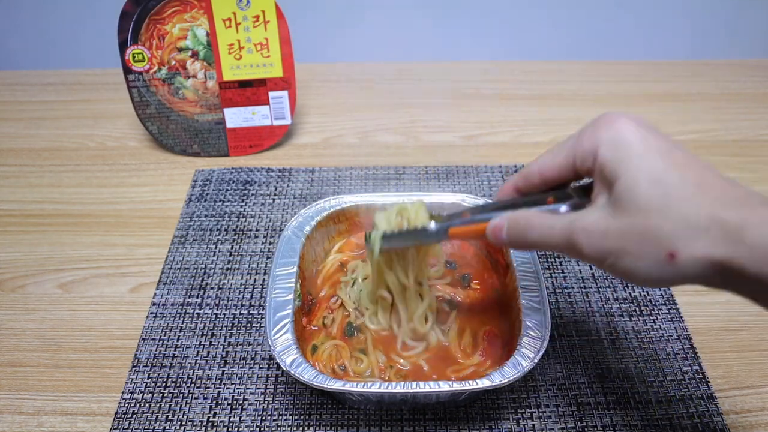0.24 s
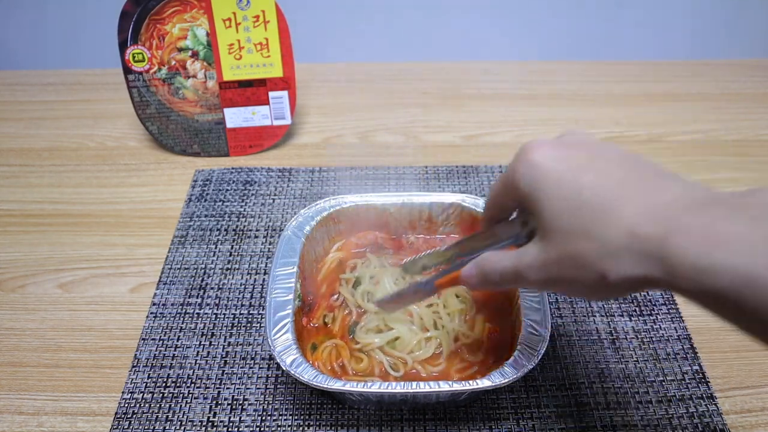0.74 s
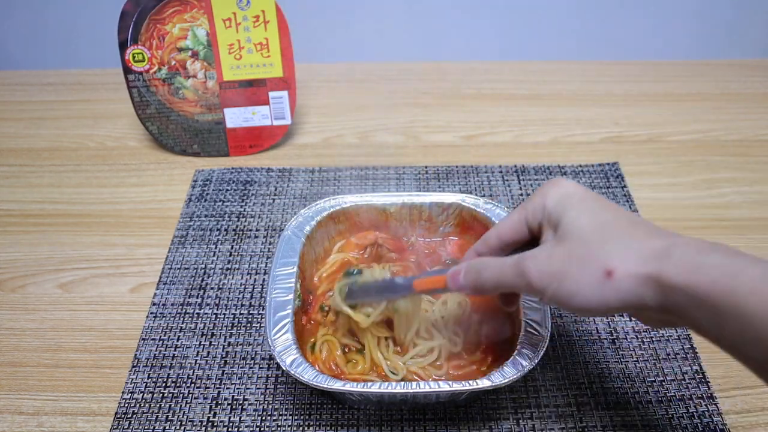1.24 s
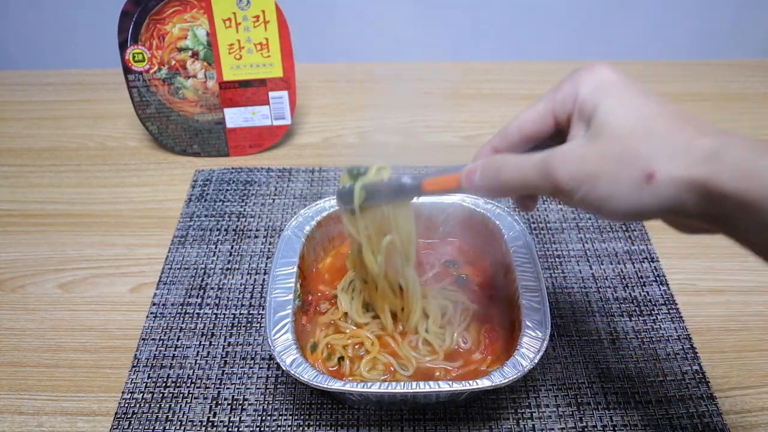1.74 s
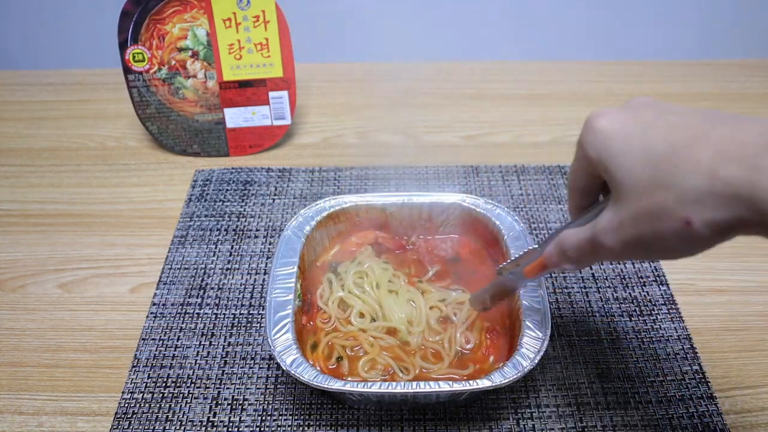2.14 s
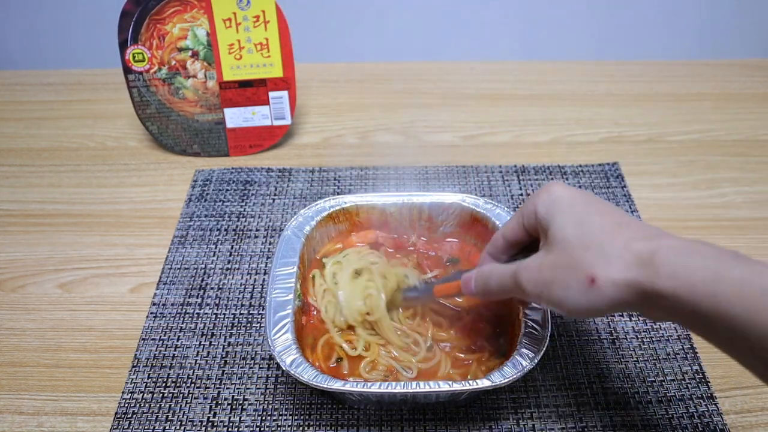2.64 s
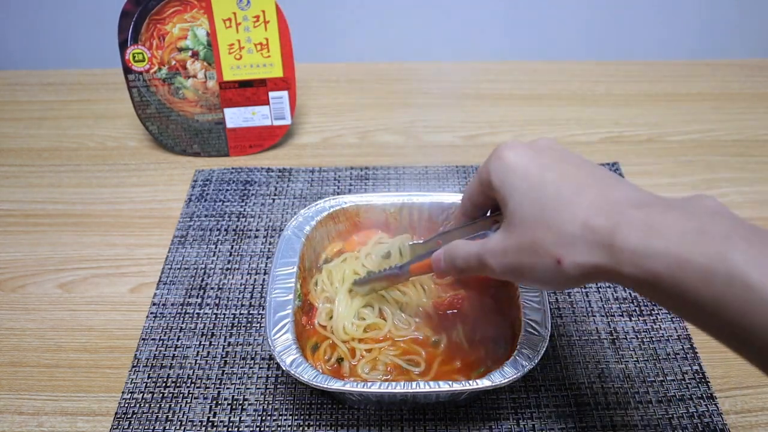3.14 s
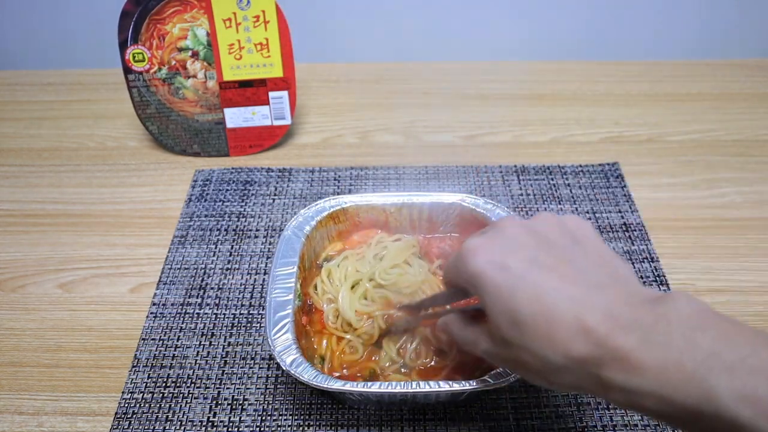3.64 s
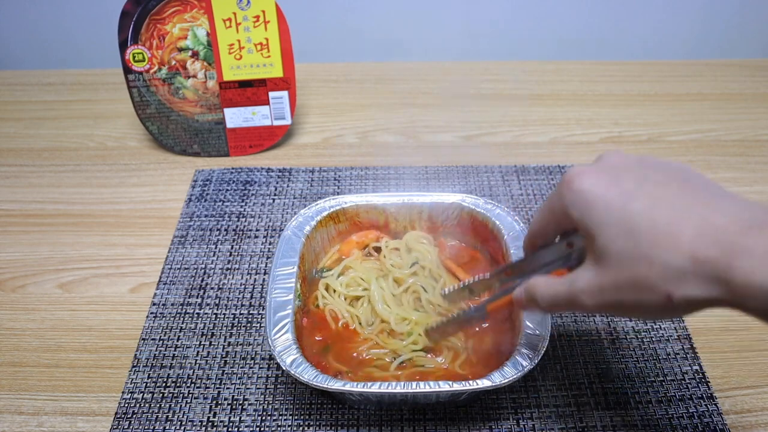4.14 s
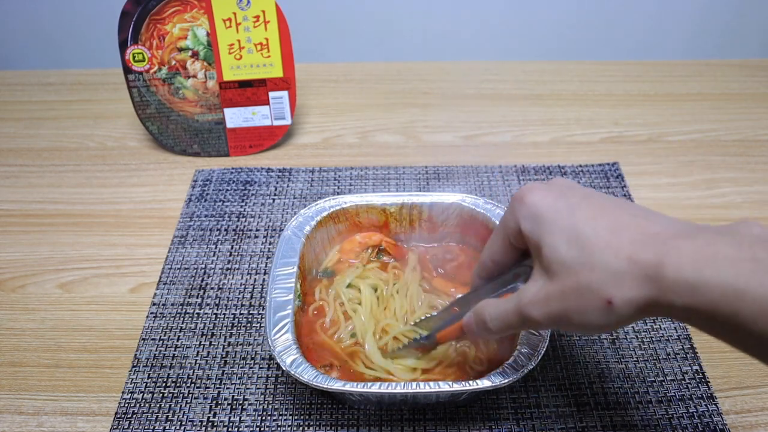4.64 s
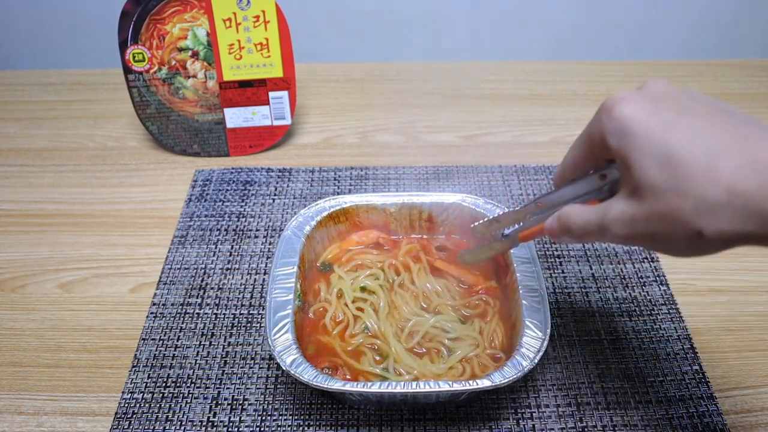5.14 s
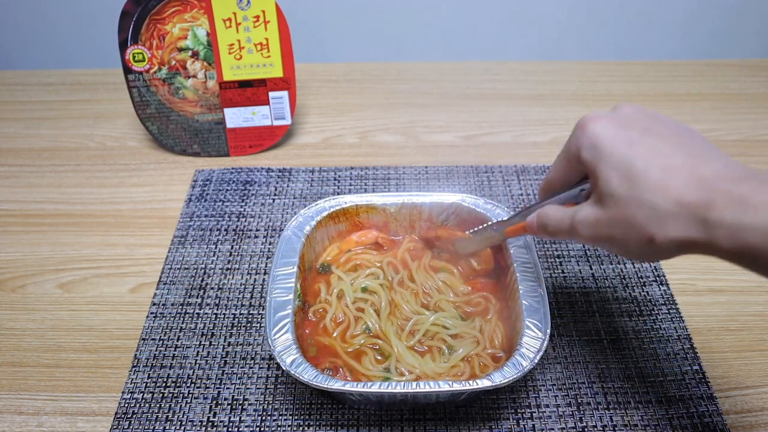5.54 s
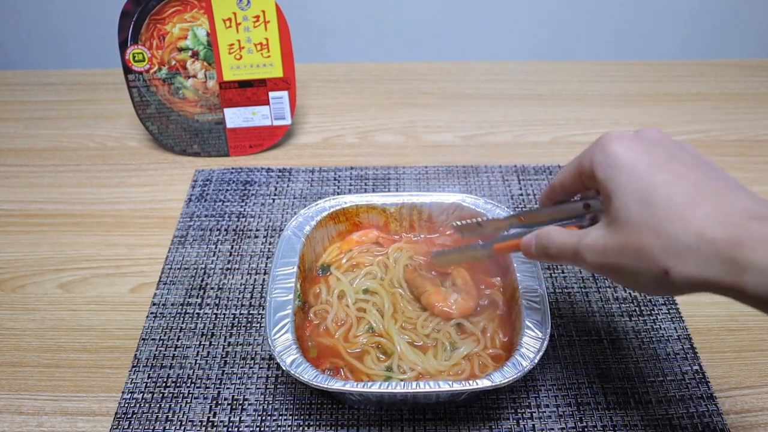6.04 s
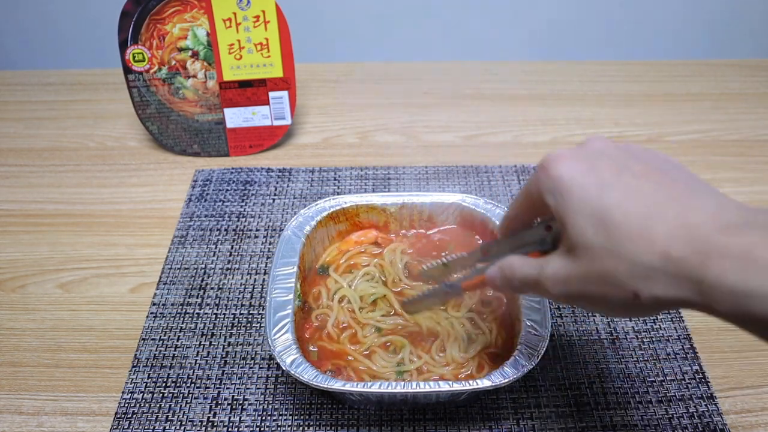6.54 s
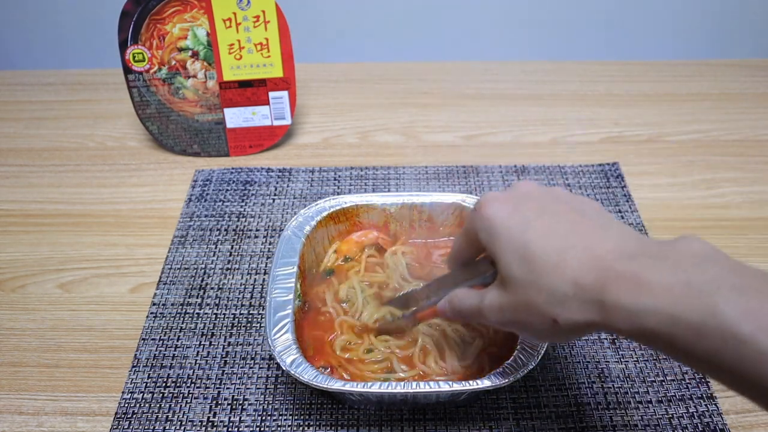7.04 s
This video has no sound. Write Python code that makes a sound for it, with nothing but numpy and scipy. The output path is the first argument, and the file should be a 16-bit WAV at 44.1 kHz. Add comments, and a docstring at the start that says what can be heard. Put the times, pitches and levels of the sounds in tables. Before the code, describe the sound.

Metal tongs stir wet noodles in a foil tray, soft squelches and tiny ticks, with one sharp tinny clatter around two seconds in a quiet room.

```python
"""Stirring noodle soup in a foil tray

Steel tongs stir noodles in a foil tray of soup on a table, close by in a small quiet room.
The tips knock the tray a few times: damped sine waves ring for the tray, its rim and the table.
Parting wet strands, and two light knocks, give small ticks (tiny wave bursts).
The noodles squelch and rustle (shaped noise).
An appliance hums softly (wavering sine waves) over room air and microphone hiss (steady noise)."""
import sys
import numpy as np
from scipy import signal
from scipy.fft import rfft, irfft, next_fast_len
from scipy.io import wavfile
from scipy.ndimage import map_coordinates

SR = 44100
rng = np.random.default_rng(int(sys.argv[2]) if len(sys.argv) > 2 else 0)


def store_pcm(level_fs):
    """Save levels as 16-bit WAV."""
    pcm = np.round(np.clip(level_fs, -1, 1) * 32767).astype(np.int16)
    wavfile.write(sys.argv[1], SR, np.atleast_2d(pcm).T)


N = 320942  # length in samples


def amp(db):
    """Gain of a level in dB."""
    return 10 ** (np.asarray(db) / 20)


def unit(x):
    """x scaled to an average strength (rms) of 1."""
    return x / np.sqrt(np.mean(x ** 2) + 1e-20)


def along(points, hz):
    """Reads (f/Hz, value) points at any frequency, with straight lines on a log scale."""
    f, value = np.transpose(points)
    return np.interp(np.log(hz + 1), np.log(f + 1), value)


def curves(rows):
    """One value per sample for each column after the time."""
    s, *columns = np.transpose(rows)
    return [np.interp(np.arange(N) / SR, s, column) for column in columns]


def wobble(rate):
    """A smooth random curve through this many random points a second."""
    points = rng.standard_normal(int(N * rate / SR) + 4)
    return map_coordinates(points, [np.arange(N) * rate / SR])


def filtered(x, response):
    """Makes each frequency of x louder or softer by response(hz)."""
    m = next_fast_len(len(x) + SR // 2)  # spare room so that the end does not wrap to the start
    return irfft(rfft(x, m) * response(np.fft.rfftfreq(m, 1 / SR)), m)[:len(x)]


def coloured(noise, spectrum):
    """Noise shaped by (f/Hz, level/dB) points, at rms 1."""
    return unit(filtered(noise, lambda hz: amp(along(spectrum, hz))))


def add(track, s, sound):
    """Mixes a sound into the track at s seconds."""
    at = track[round(s * SR):][:len(sound)]
    at += sound[:len(at)]


def no_tilt(hz):
    """Leaves every mode at its own level."""
    return 0


def ring(modes, t, tilt=no_tilt):
    """A struck object sounds several fading tones (modes), each at a slightly new strength."""
    hz, db, t60 = np.transpose(modes)[:, :, None]
    scatter_db = 1.5
    db = db + tilt(hz) + scatter_db * rng.standard_normal(hz.shape)
    return np.sum(amp(db - 60 * t / t60) * np.sin(2 * np.pi * hz * t), axis=0)


# how long the room rings, t60 being the time to fade by 60 dB: (f/Hz, t60/s)
ROOM_DECAY = [(300, 0.31), (1200, 0.53), (4000, 0.28), (8000, 0.36), (14000, 0.11)]


def room_tail():
    """One fresh echo of the room, energy 1: noise that builds up quickly and dies band by band."""
    hz, t, bands = signal.stft(rng.standard_normal(SR // 2), SR, nperseg=256)
    fade = amp(-60 * t / along(ROOM_DECAY, hz)[:, None])
    echo = signal.istft(bands * fade, SR, nperseg=256)[1]
    echo = echo * (1 - np.exp(-np.arange(len(echo)) / SR / 0.00058))
    return echo / np.linalg.norm(echo)


# colour of room air and microphone hiss, before its overall level: (f/Hz, level/dB per Hz)
AIR_COLOUR = [(12, -50), (45, -20), (68, -14.5), (107, -5), (136, -10.5), (158, -2.5), (499, -5.5),
              (574, -9), (1190, -10), (1900, -17), (3250, -26), (6700, -31.5), (9000, -34.5),
              (15800, -35.5)]
# hums, with the level before it wavers: (f/Hz, width/Hz, level/dB rms)
HUMS = [(33, 1.2, -85), (56.6, 2.2, -94), (108.7, 6, -74), (176, 15, -77.5), (237, 20, -73.5),
        (293.8, 15, -75), (368.5, 20, -76.5), (503, 18, -77), (640, 20, -76), (1206, 45, -75)]


def room_tone():
    """Broad air noise with soft hums whose pitch and level waver, faster for wider hums."""
    air_db = -61 + 0.58 * wobble(1.36)
    sound = amp(air_db) * coloured(rng.standard_normal(N), AIR_COLOUR)
    for hz, width_hz, db in HUMS:
        pitch = hz + 0.398 * width_hz * wobble(width_hz)
        level = np.sqrt(2) * amp(db + 2.5 * wobble(width_hz))  # a sine's peak is root 2 times its rms
        sound = sound + level * np.sin(2 * np.pi * np.cumsum(pitch) / SR)
    return sound


# noodles moving in the broth: (t/s, wet rustle level/dB, fizz level/dB)
STIRRING = [(0.0, -76, -84), (0.42, -72, -79), (0.7, -77, -88), (1.0, -71.5, -84), (1.6, -81, -88),
            (1.96, -72, -76), (2.1, -78, -87), (2.75, -71.5, -80), (3.2, -74, -84.5), (3.45, -79, -89),
            (3.85, -71, -85), (4.32, -82, -86), (4.48, -79, -80), (5.6, -83, -88), (5.88, -77, -84),
            (6.6, -87, -88), (6.86, -79, -83), (7.28, -80, -89)]
# colour of the wet rustle: (f/Hz, level/dB per Hz)
RUSTLE_COLOUR = [(1000, -5), (1800, -2), (3200, -7), (5000, -21)]
# colour of the thin fizz: (f/Hz, level/dB per Hz)
FIZZ_COLOUR = [(2800, -16), (4500, -3), (7000, 12.5), (9500, 8.5), (13000, -28)]


def soup():
    """Noodles slide through the broth: a lumpy wet rustle and a thin fizz above it."""
    rustle_db, fizz_db = curves(STIRRING)
    rustle_lumps = amp(3.5 * wobble(6) + 2.2 * wobble(30) + 4.5 * wobble(400))
    rustle = coloured(rustle_lumps * rng.standard_normal(N), RUSTLE_COLOUR)
    fizz_lumps = amp(1.5 * wobble(4.4) + 5.3 * wobble(500))
    fizz = coloured(fizz_lumps * rng.standard_normal(N), FIZZ_COLOUR)
    return amp(rustle_db) * rustle + amp(fizz_db) * fizz


# noodles squelching, level before the fade and clumps: (t/s, level/dB, centre f/Hz, t60/s, spray level/dB)
SQUELCHES = [(0.0676, -60.5, 1990, 0.14, -14), (0.486, -63, 1620, 0.15, -14),
             (0.6764, -62.5, 2040, 0.28, -24), (1.027, -56, 1870, 0.15, -8), (2.6898, -62, 1980, 0.18, -7),
             (2.826, -60.5, 2130, 0.29, -5), (3.056, -62, 1970, 0.52, -12), (3.69, -62, 1870, 0.1, -8),
             (4.43, -64, 1870, .2, -10), (6.818, -63, 1990, 0.19, -12)]


def squelches():
    """Short wet squelches: clumped grainy noise in one resonance, with a spray that thins upward."""
    out, t = np.zeros(N), np.arange(SR // 3) / SR
    clumps = amp(1.8 * wobble(70))
    width_hz = 800
    for s, db, hz, t60, spray_db in SQUELCHES:
        def colour(f):
            resonance = (1j * f * width_hz / (hz * hz - f * f + 1j * f * width_hz)) ** 2
            spray = amp(spray_db) * (f > hz) * (f < 9000) * hz / (f + 1)
            return resonance + spray

        grit = rng.standard_normal(len(t)) * rng.exponential(1, len(t))
        swell_and_fade = amp(db - 60 * t / t60) * (1 - np.exp(-t / 0.0043))
        add(out, s, swell_and_fade * unit(filtered(grit, colour)))
    return out * clumps


def faint_ticks(count):
    """Random small ticks, denser where the broth fizzes more."""
    weakest_db, mean_excess_db = -69, 3.5
    lowest_hz, range_octaves = 3540, 1.63
    width_over_pitch = 0.45  # on average
    busy = np.cumsum(amp(curves(STIRRING)[1]))
    when, size, pitch, wide = rng.random((count, 4)).T
    s = np.searchsorted(busy, when * busy[-1]) / SR
    db = weakest_db - mean_excess_db * np.log(1 - size)  # many weak ones, few strong ones
    hz = lowest_hz * 2 ** (range_octaves * pitch)
    return np.c_[s, db, hz, width_over_pitch * hz * (0.5 + wide)]


# the clearest small ticks: wet strands and droplets parting, and the bright clicks of two light knocks
# (at 1.797 s and 7.0387 s): (t/s, level/dB, centre f/Hz, width/Hz)
CLEAR_TICKS = [(0.2237, -57, 5790, 2000), (0.2974, -47, 7640, 3500), (0.31, -52, 4330, 2900),
               (0.372, -56, 5850, 2000), (0.392, -47, 9470, 7400), (0.4914, -51, 3690, 2600),
               (0.5046, -56, 8500, 2000), (0.8613, -46.5, 5300, 3030), (0.9442, -55, 8150, 1700),
               (1.038, -50, 12520, 4300), (1.2692, -51.5, 7600, 1800), (1.3203, -54, 11470, 3400),
               (1.3696, -54, 7420, 2700), (1.6442, -57, 9380, 3500), (1.797, -55, 6400, 5000),
               (1.8503, -56, 10890, 4500), (1.9165, -57, 6870, 3900), (1.9512, -48, 5530, 4120),
               (1.9765, -51, 5890, 3900), (1.9903, -53, 6340, 2100), (2.0125, -49, 6650, 6750),
               (2.6915, -53, 6550, 8000), (2.7457, -58, 9100, 2100), (2.7581, -55, 8010, 3000),
               (2.8308, -59, 8290, 6900), (2.8401, -53, 3480, 2300), (3.0165, -52.5, 4200, 1200),
               (3.1403, -55, 3660, 1400), (3.153, -54, 7700, 2200), (3.212, -55, 4560, 3400),
               (3.2884, -53, 7800, 2400), (3.4746, -54, 7660, 1600), (3.5062, -53, 8990, 3100),
               (3.5266, -53, 9160, 4200), (3.8407, -54, 4610, 4500), (4.0309, -50.5, 6530, 3700),
               (4.1043, -52, 5510, 2200), (4.4398, -55, 6590, 4400), (4.5052, -51, 8100, 2800),
               (4.5582, -50.5, 4600, 1800), (5.2621, -56, 3380, 3320), (5.4469, -58, 8300, 2500),
               (5.9206, -52, 4600, 2900), (5.9442, -48, 8060, 5300), (6.4292, -50.5, 8340, 4200),
               (6.8305, -54, 7440, 2200), (6.9679, -57, 7740, 2700), (6.976, -57, 8600, 2500),
               (7.0293, -39.5, 5840, 3200), (7.0387, -35, 4300, 6500), (7.1418, -57, 5170, 1400),
               (7.1807, -39, 7900, 5130)]


def ticks():
    """A wet film snaps or a tip clicks: a tiny wave burst, again off the table; fainter ones at random."""
    out, t = np.zeros(N), np.arange(-88, 176) / SR  # from 2 ms before the burst's peak to 4 ms after
    for s, db, hz, width_hz in [*CLEAR_TICKS, *faint_ticks(count=210)]:
        def burst(u):
            return np.exp(-(2.33 * width_hz * u) ** 2) * np.cos(2 * np.pi * hz * u)

        bounce = 0.6 * burst(t - 0.00033)
        grit = 0.17 * (t > 0) * np.exp(-np.abs(t) / 0.0016) * rng.standard_normal(len(t))
        add(out, max(s + t[0], 0), amp(db) * (burst(t) + bounce + grit))
    return out + amp(-14) * signal.fftconvolve(out, room_tail())[:N]


# tips against the tray; a higher focus keeps the ring nearer to its loudest pitch:
# (t/s, level/dB, loudest tray f/Hz, tray focus/dB per octave squared,
#  rim level/dB, loudest rim f/Hz, rim focus/dB per octave squared)
TRAY_KNOCKS = [(0.971, -45, 1100, 5, -10, 4220, 18), (1.067, -39.5, 1010, 25, -20, 5200, 10),
               (1.7957, -47.5, 1250, 8, -11, 4000, 4), (2.1984, -12.5, 1350, 1.5, -6.5, 3600, 1.5),
               (2.2068, -16.5, 1380, 12, -12.5, 3700, 8), (2.286, -13.5, 1430, 1, -7, 5200, 3),
               (2.304, -13.5, 1474, 5, -5.5, 4840, 7), (2.3227, -14, 1380, 13, -7.5, 4840, 8),
               (2.3436, -28, 1480, 4, -10, 5500, 4), (2.4872, -46, 1900, 4, -4.5, 3300, 12),
               (2.533, -50, 1890, 39, -6, 3180, 25), (2.5849, -36.5, 1170, 2.5, -16.5, 4380, 14),
               (5.3912, -24, 1394, 5.5, -8, 3880, 90), (5.4406, -45, 1530, 16, -4, 5530, 8),
               (5.538, -53.5, 1920, 14, -12, 3540, 8), (7.1889, -44, 1750, 7, -9, 4700, 9)]
# modes of the loaded tray: (f/Hz, level/dB, t60/s)
TRAY_MODES = [(662, -9.5, 0.12), (825, -6, 0.044), (1050, 0, 0.027), (1133, -1.5, 0.043),
              (1295, 5.5, 0.018), (1445, 4.5, 0.017), (1646, 2.5, 0.024), (1803, -10, 0.043),
              (1910, -38, 0.011), (2200, -7.5, 0.025), (2580, -5, 0.014)]
# modes of the thin foil rim and steel tips: (f/Hz, level/dB, t60/s)
RIM_MODES = [(3170, -4.5, 0.012), (3540, 5.5, 0.0063), (3890, 3.5, 0.0074), (4500, -3.5, 0.014),
             (5080, 0.5, 0.01), (5600, 0, 0.0076), (6320, 2.5, 0.0084), (7510, 5.5, 0.0056),
             (8040, -2, 0.0063), (9740, -8.5, 0.0096), (13240, -3, 0.0062), (14300, -25, .005)]
# lowest mode of the table top: (f/Hz, level/dB, t60/s)
TABLE_MODE = [(94.5, 0, 0.21)]
# near surfaces that send the knock back: (delay t/s, level/dB)
NEAR_ECHOES = [(.0045, -18), (.013, -20.5), (.019, -22), (.031, -27)]
# colour of a knock summed over all directions: (f/Hz, level/dB per Hz)
ALL_ROUND_COLOUR = [(210, -31), (350, -3.5), (481, -18), (671, -8.5), (837, -17), (936, -6.5), (1130, -9.5),
                    (2750, -19), (2980, -15), (6280, -22), (15500, -43)]


def knocks():
    """Each contact rings the tray and rim, loudest near the pitches of the spot, and thumps the table."""
    out, low, t = np.zeros(N), np.zeros(N), np.arange(SR // 5) / SR
    hard_db, hard_rise_s = -14, 0.00075  # knocks this loud or louder rise this fast
    softer_rise = 0.18  # dB of extra rise time per dB of softer knock
    thump_db, thump_grows = -45.5, 0.49  # thump of a 0 dB knock; dB of thump per dB of knock
    for s, db, spot_hz, focus_db, rim_db, rim_hz, rim_focus_db in TRAY_KNOCKS:
        def tray_tilt(hz):
            return -focus_db * np.log2(hz / spot_hz) ** 2

        def rim_tilt(hz):
            floor_db = np.where(hz > rim_hz, -9, -24)
            return np.maximum(-rim_focus_db * np.log2(hz / rim_hz) ** 2, floor_db)

        def fold_tilt(hz):
            return min(0.24 * rim_focus_db, 12)

        def all_round(hz):
            bright_db = (rim_db + 7.5) * 1.06 - 0.043 * rim_focus_db
            return amp(along(ALL_ROUND_COLOUR, hz) + bright_db * (hz > 2200))

        body = ring(TRAY_MODES, t, tray_tilt)
        body += ring([(spot_hz, 4.5, 0.018)], t)  # the struck panel itself
        rim = ring(RIM_MODES, t, rim_tilt)
        rim += ring([(rim_hz, -11, 0.024)], t, fold_tilt)  # the nearest fold of the rim
        crack = 0.21 * amp(-60 * t / 0.0048) * np.diff(rng.standard_normal(len(t) + 1))

        # a soft push is taken up more slowly
        rise_s = hard_rise_s * amp(softer_rise * max(hard_db - db, 0))
        body = body * (1 - np.exp(-t / rise_s))
        rim = (rim + crack) * (1 - np.exp(-t / 0.00022))
        blow = -amp(db) * (body / np.abs(body).max() + amp(rim_db) * rim / np.abs(rim).max())
        for delay, echo_db in [(0, 0), *NEAR_ECHOES]:
            add(out, s + delay, amp(echo_db) * blow)

        # the room mixes all directions, so its answer is partly broad where the direct ring has gaps
        broad = filtered(room_tail(), all_round)
        add(out, s, amp(-12.5) * np.linalg.norm(blow) * broad / np.linalg.norm(broad))
        add(out, s, amp(-18) * signal.fftconvolve(blow, room_tail()))
        thump = ring(TABLE_MODE, t) * (1 - np.exp(-t / 0.006))
        add(low, s, amp(thump_db + thump_grows * db) * thump)
    # a small tray radiates no bass
    return low + filtered(out, lambda hz: (1j * hz / (1j * hz + 300)) ** 3)


def scene():
    """All the sounds added up at one microphone."""
    return (room_tone() + soup() + squelches() + ticks() + knocks())[None]


def record(dry):
    """Keeps only what lies below the upper band limit."""
    top_hz = 15830
    return filtered(dry[0], lambda hz: hz < top_hz)[None]


dry = scene()
out = record(dry)
store_pcm(out)
```